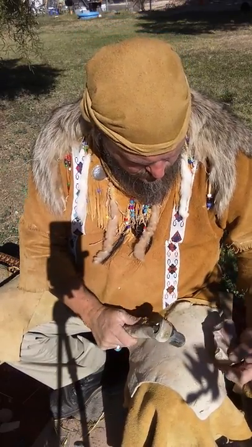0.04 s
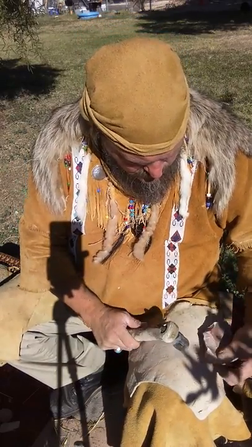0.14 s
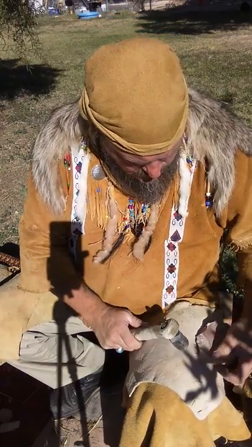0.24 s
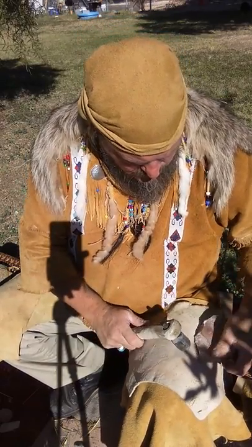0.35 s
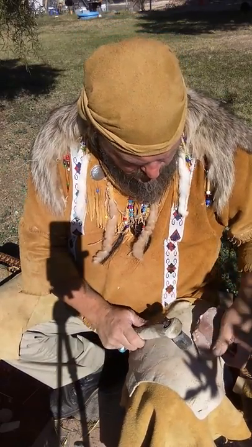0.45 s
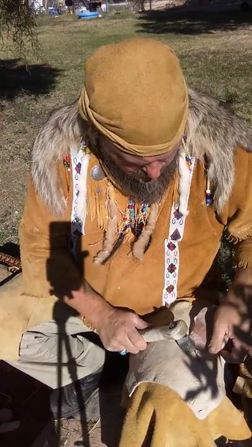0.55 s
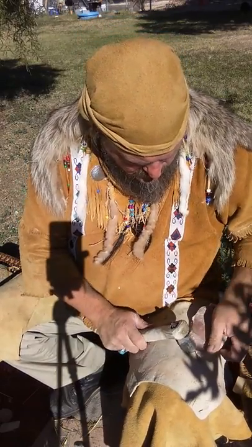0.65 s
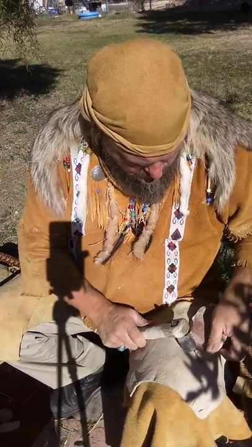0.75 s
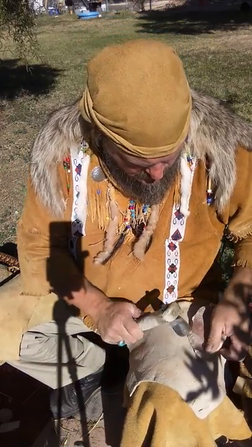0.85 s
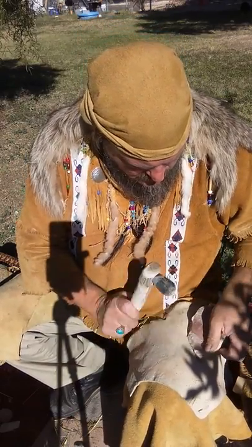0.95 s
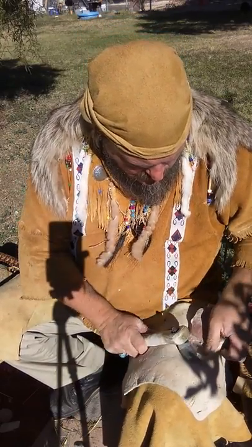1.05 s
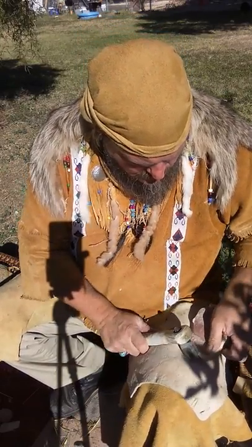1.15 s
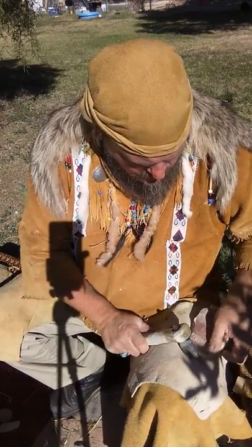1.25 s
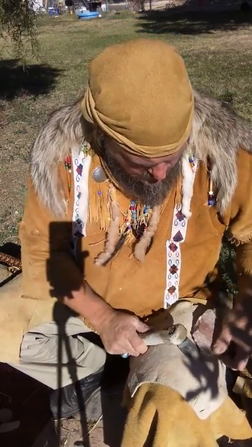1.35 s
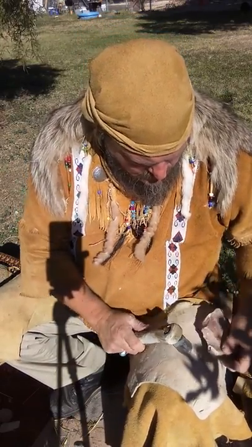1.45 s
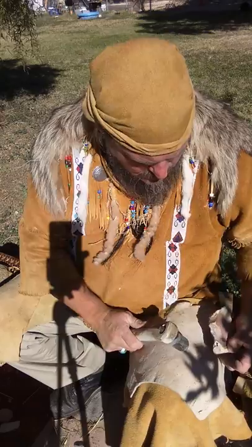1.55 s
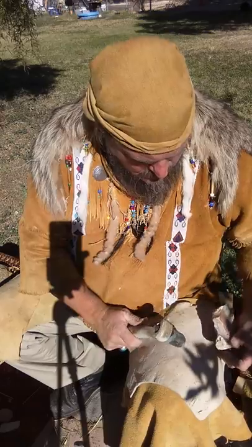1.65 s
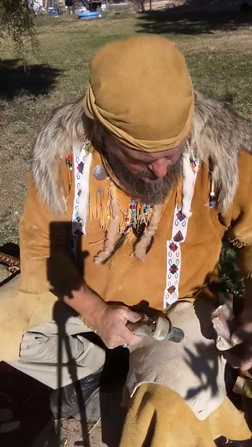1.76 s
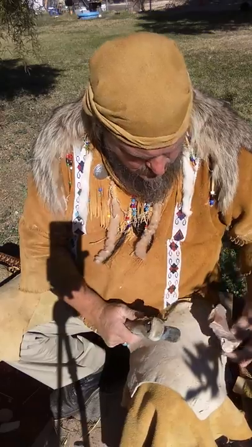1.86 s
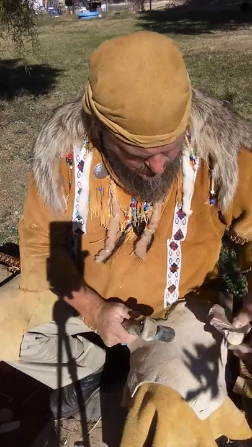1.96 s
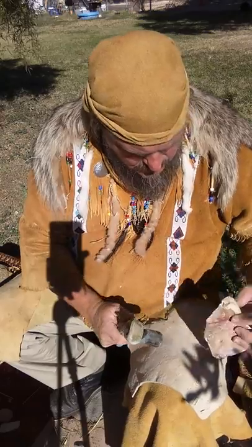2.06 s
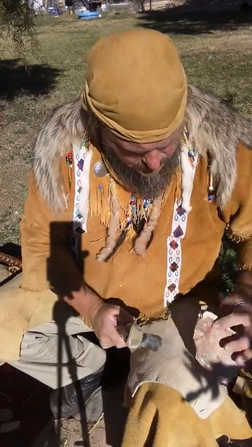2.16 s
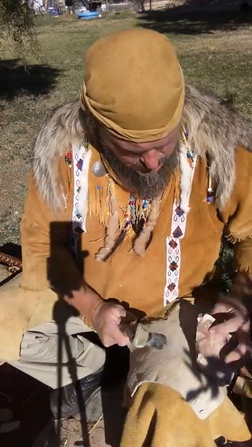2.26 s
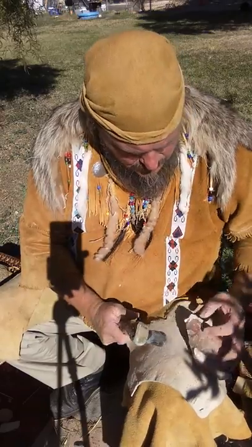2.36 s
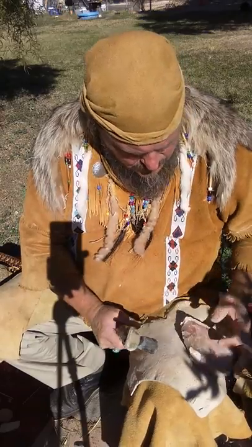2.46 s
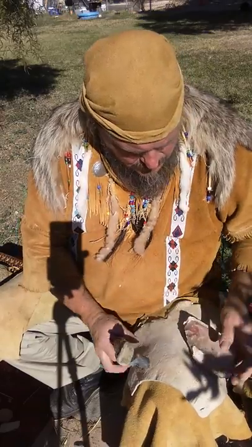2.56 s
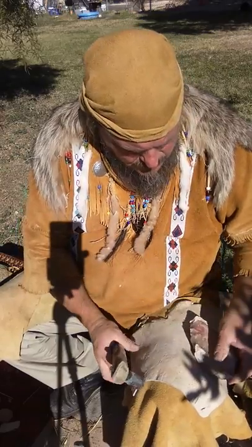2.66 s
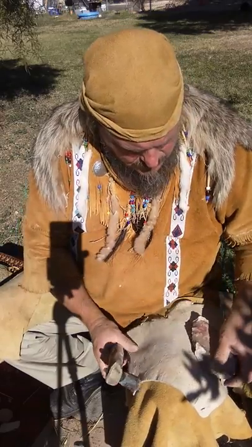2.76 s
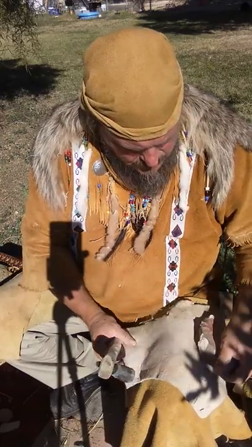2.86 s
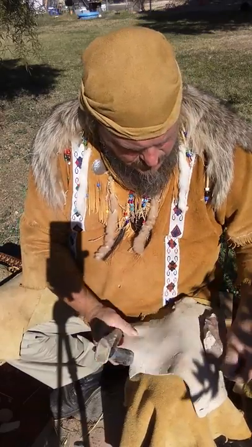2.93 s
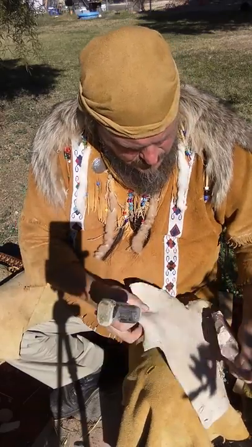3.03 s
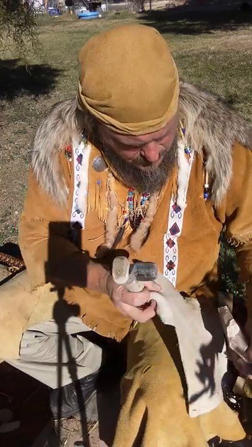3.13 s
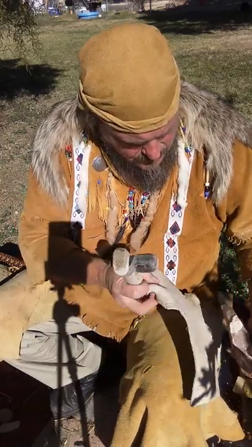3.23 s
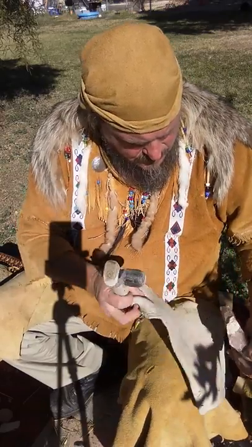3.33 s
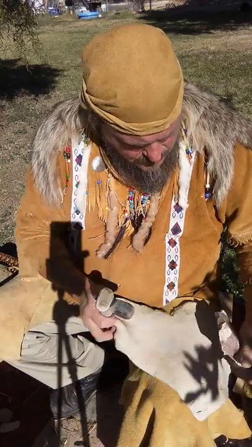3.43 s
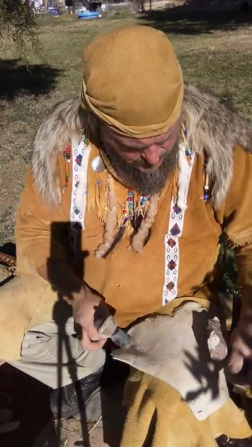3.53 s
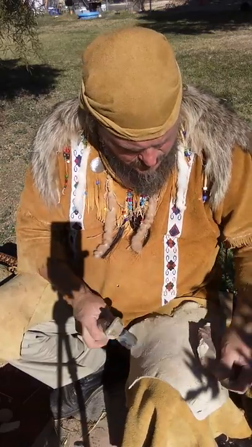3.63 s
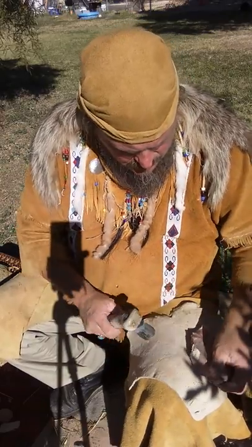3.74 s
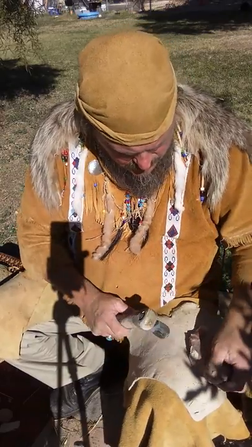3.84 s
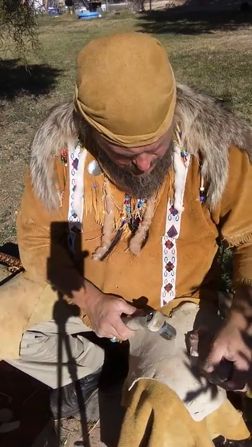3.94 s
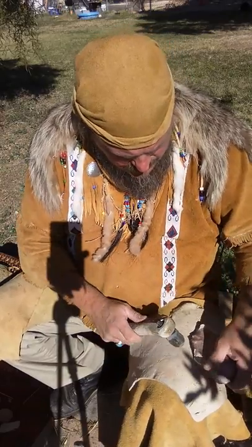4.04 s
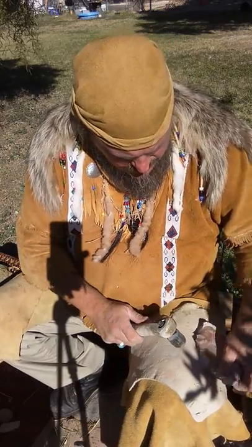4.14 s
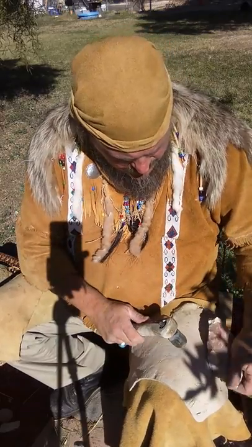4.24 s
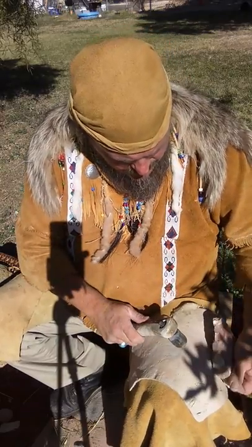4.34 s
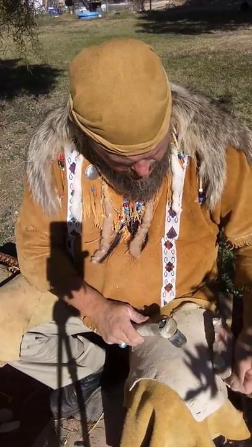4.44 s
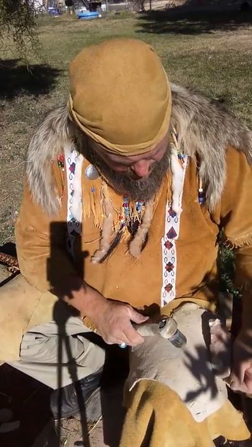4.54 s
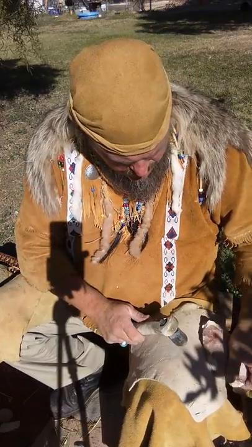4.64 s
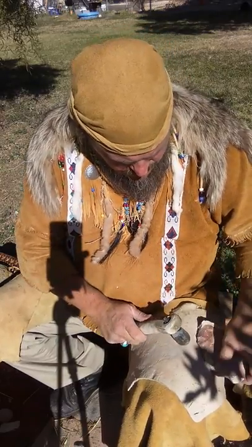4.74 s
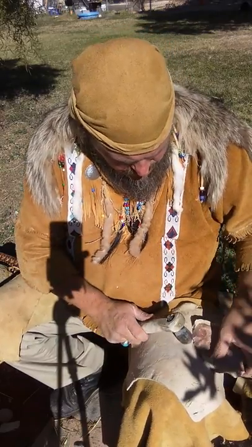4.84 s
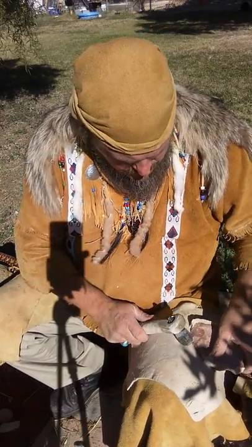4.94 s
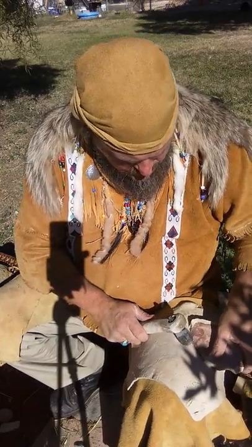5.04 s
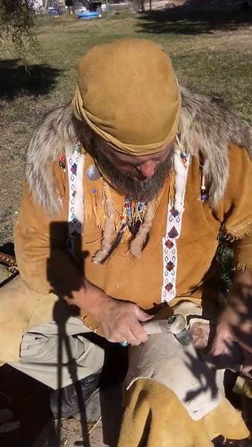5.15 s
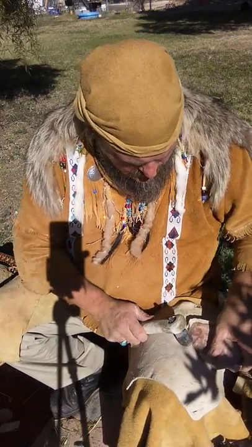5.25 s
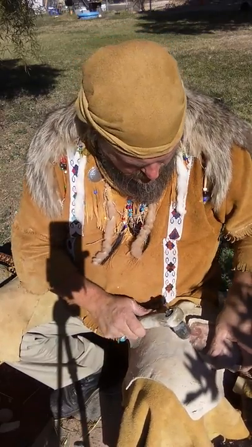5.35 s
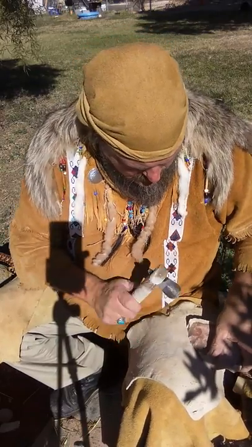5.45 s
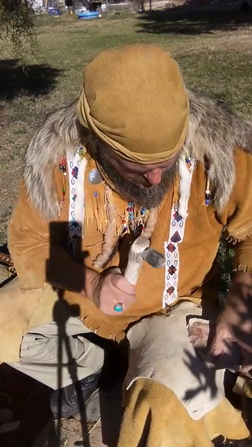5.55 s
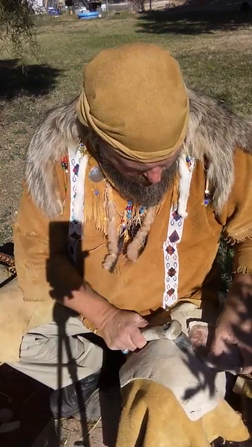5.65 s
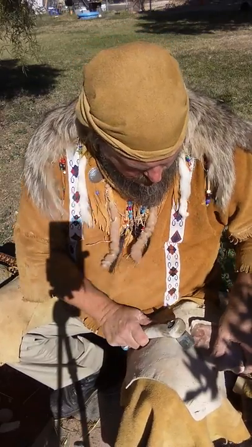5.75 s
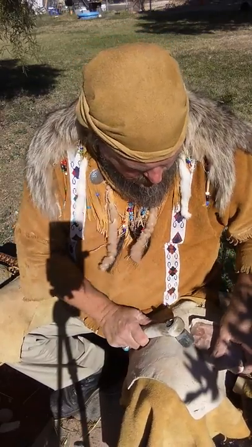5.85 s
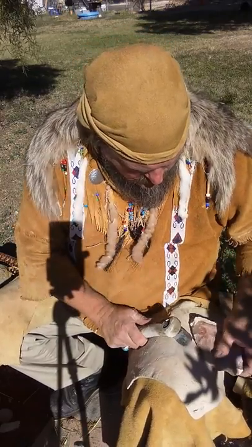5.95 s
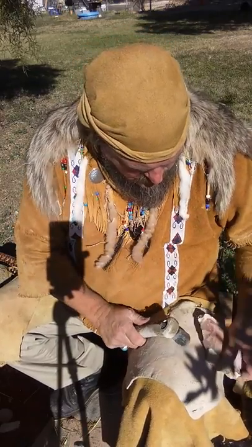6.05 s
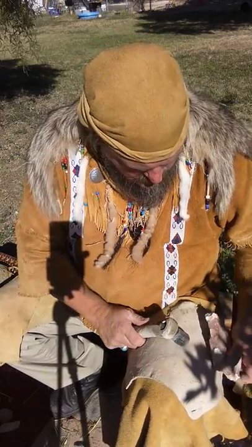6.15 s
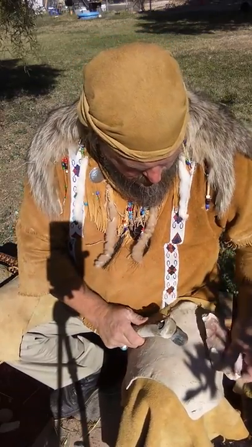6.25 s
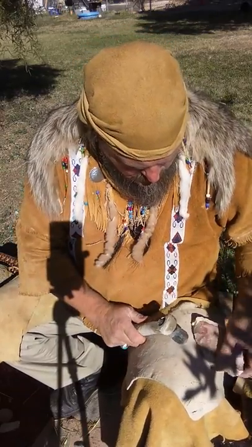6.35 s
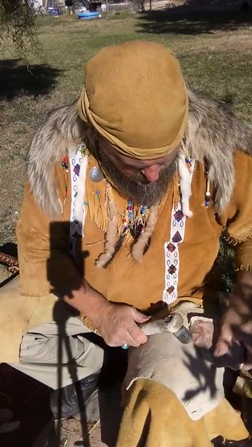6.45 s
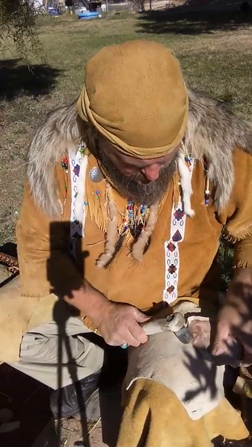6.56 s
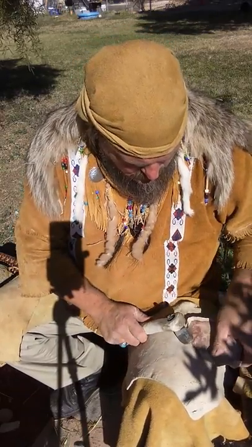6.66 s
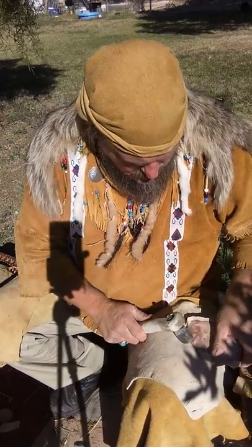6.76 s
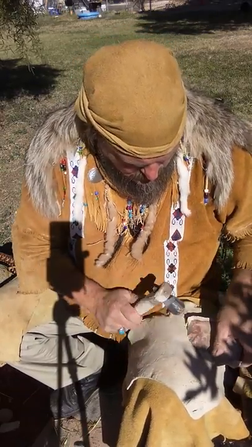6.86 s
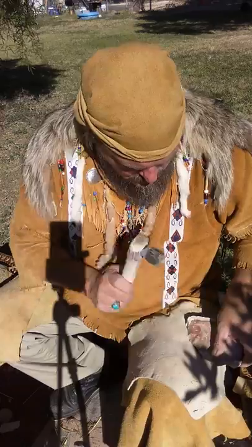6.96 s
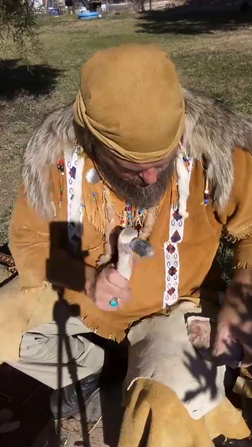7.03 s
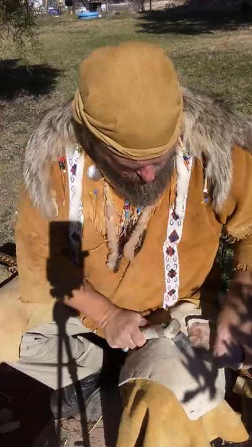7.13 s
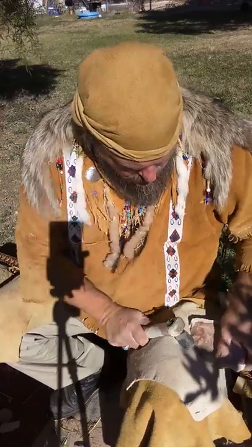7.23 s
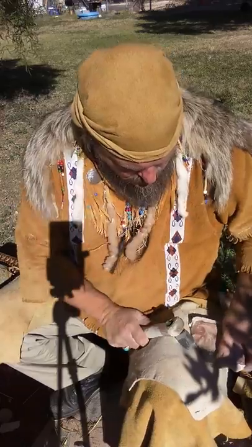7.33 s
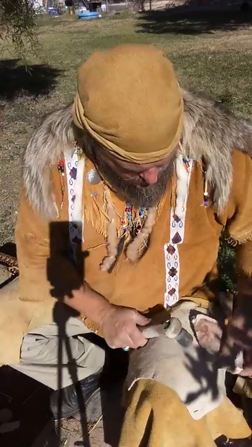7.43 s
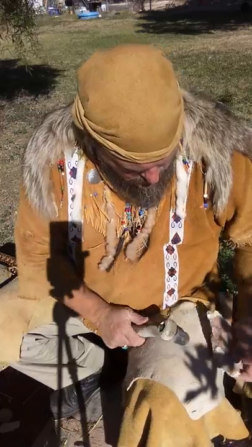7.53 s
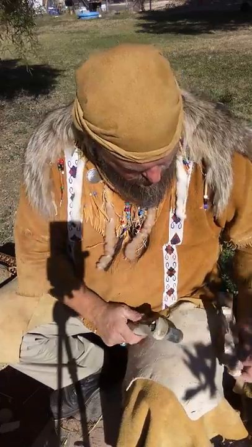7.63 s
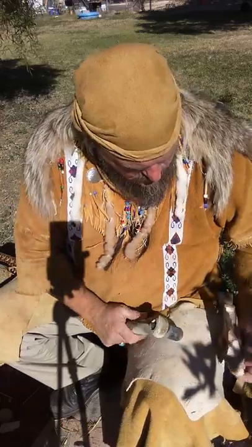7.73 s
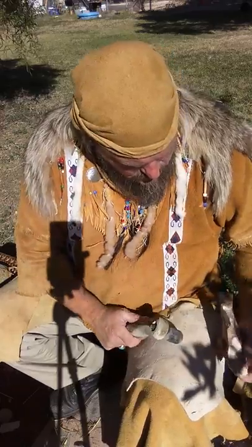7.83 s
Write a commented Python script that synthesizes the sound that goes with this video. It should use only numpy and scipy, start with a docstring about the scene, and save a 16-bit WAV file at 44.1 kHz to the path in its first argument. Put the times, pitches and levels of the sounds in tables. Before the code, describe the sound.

Three loud, dry stone strikes dominate: the first snappy and tinkling, the later two duller, crunchier and closer together. Between them are very faint hide rustles, scuffs and gritty ticks. Far away, a rooster's hoarse drawn-out crow, two single dog barks, small bird chirps and thin insect pips. The microphone is near the work outdoors, with soft air noise and low wind buffeting that grows into gusts.

```python
"""Flint knapping outdoors: three hammer blows ring the modes of a hand-damped stone and a thin chip, over noise
bursts for snap, crunch and the thud into a padded leg; shaped noise is the answer of ground, fence and wall.
Handling is leather noise in strokes, scuffs, grit ticks and a tool knock. Far off, harmonic voices make a crowing
rooster and a dog that barks twice; gliding and buzzing tones make small birds and a low call, over insect pips.
Low noise in breeze and gusts is wind buffeting the microphone ports, above soft air noise."""
import sys
import numpy as np
from scipy import signal
from scipy.fft import rfft, irfft, next_fast_len
from scipy.io import wavfile
from scipy.ndimage import map_coordinates

SR = 44100
rng = np.random.default_rng(int(sys.argv[2]) if len(sys.argv) > 2 else 0)


def digitize_waveform(pressure):
    """Quantize a signal to 16-bit integers and store it at the path in sys.argv[1].

    Rows of a 2-D input are taken as channels; values are limited to [-1, 1].
    """
    field = np.atleast_2d(pressure).T
    bounded = np.clip(field, -1, 1)
    quanta = np.round(bounded * 32767).astype(np.int16)
    wavfile.write(sys.argv[1], SR, quanta)


N = 347949

# Levels in the tables are relative: each source trims them.
# Hammer blows. Each row: start in seconds, level in dB, most excited pitch in Hz, crunch t60 in seconds,
# chip level in dB, thud level in dB, thud pitch in Hz, yard level over the blow in dB.
BLOWS = [(0.9719, -5, 1830, 0.031, -8, -28, 320, -5.5), (5.5791, -5, 3600, .055, -23, -13.5, 485, 0.64),
         (7.041, -4, 3230, .055, -28.5, -9, 345, -0.5)]
# Modes of the stone. Each row: frequency in Hz, level in dB, t60 in seconds before the hand's limit.
STONE_MODES = [(1488, -3, 0.069), (1680, -0.5, .03), (1962, -8, .035), (2248, -7, 0.039),
               (2706, -9.5, 0.029), (3250, -10.5, 0.03), (3430, -3, 0.036), (3604, -7.5, 0.036),
               (4070, -13, .045), (4380, -13.5, .04), (5900, -12, 0.036), (6200, -13.5, 0.015),
               (7450, -13.5, .03), (8260, -9, 0.13)]
HAND_LIMIT_T60_S = 0.05
# Modes of the thin chip. Each row: frequency in Hz, level in dB, t60 in seconds.
CHIP_MODES = [(9280, -3, 0.046), (13100, -16.5, 0.044), (15500, -22, .03)]
# Spectrum of the crunch. Each row: frequency in Hz, level in dB.
CRUNCH_SPECTRUM = [(60, -14), (160, -8), (290, -2), (550, -9.5), (1000, -3.5), (1500, -2), (2100, -1),
                   (2700, 0.5), (4000, 4), (6000, -5), (9000, -11.5), (13500, -14.5), (16000, -28.5)]
# Modes of the hammer's handle. Each row: frequency in Hz, level in dB, t60 in seconds.
HAFT_MODES = [(593, -3, 0.013), (683, 0.5, .035)]
PAD_WIDTH_OCT, PAD_T60_S = 0.38, 0.027
# Stone as the two ports hear it. Each row: frequency in Hz, left minus right in dB.
PORT_LEVEL = [(60, 6), (130, 2), (290, -4), (640, 1.5), (1410, 1), (3100, 2.5), (6820, 6.0), (15000, 6)]
# Phase between the ports. Each row: frequency in Hz, lead of the left in radians.
PORT_PHASE = [(100, 1), (300, 1.9), (600, 1.2), (1100, 2), (1600, 2.4), (2300, 0.63), (3500, 1.5),
              (6000, 2.5), (9300, 1.8), (14000, 1.1)]
# Spectrum of the yard's scatter. Each row: frequency in Hz, level in dB.
YARD_SPECTRUM = [(100, -3), (250, 3.5), (500, -1.5), (1100, -4.5), (1600, 3), (2600, 1.5), (3900, 0),
                 (5200, -11), (9000, -12.5), (15000, -19.5)]

# Hide pulled, or stone turned on it. Each row: start in seconds, length in seconds, level in dB.
STROKES = [(0.21, 0.33, -70), (0.475, 0.45, -68.5), (1.86, 0.51, -78), (2.27, 0.31, -67),
           (2.474, 0.747, -67), (3.15, 0.79, -72), (3.904, .45, -67), (4.608, 0.268, -78.5),
           (6.383, 0.32, -76.5), (7.293, 0.43, -73)]
STROKE_ATTACK_S, STROKE_RELEASE_S = 0.064, 0.19
# Spectrum of leather. Each row: frequency in Hz, level in dB.
LEATHER_SPECTRUM = [(120, -15.5), (250, 0.5), (400, -13), (750, -9.5), (1300, -8.5), (2300, -15),
                    (4400, -15.5), (8000, -22.5), (14500, -20.5), (16000, -32.5)]
# Stone, hide and sleeve brush past each other. Each row: centre time in seconds, level in dB,
# time from peak to 1/e in seconds, centre in Hz, width in octaves.
SCUFFS = [(0.277, -55, 0.017, 3580, 0.45), (0.541, -59.5, 0.037, 12000, 2.2),
          (0.703, -66.5, 0.18, 4000, .4), (1.259, -59, 0.022, 4100, 0.48), (2.903, -69, 0.115, 6980, 0.41),
          (4.086, -66, 0.13, 6220, 3.05), (5.341, -67.5, 0.0604, 2048, 1.1),
          (6.492, -56.5, 0.007, 3540, 0.13), (7.522, -72.5, 0.14, 2200, 0.58)]
# Grit. Each row: start in seconds, level in dB, spectrum level at 3500 Hz in dB.
TICKS = [(0.507, -43.5, -5), (0.5153, -42, -6.5), (0.7514, -41, -4), (2.529, -38, -24), (2.6349, -40, 1),
         (3.1901, -46, -24.5), (3.2674, -44.5, -18), (3.318, -42.5, -10.5), (3.525, -39.5, 12.5),
         (4.6462, -49.5, -1.5), (7.4431, -55.5, -6)]
# Tool nudged. Each row: start in seconds, level in dB.
KNOCKS = [(3.524, -30.5)]
# Modes of the nudged tool. Each row: frequency in Hz, level in dB, t60 in seconds.
TOOL_MODES = [(290, -5, 0.033), (453, -1.5, 0.023), (880, 4.5, 0.022), (1310, 13, 0.01), (1640, 2, 0.02),
              (2090, -4, 0.017)]

# Rooster notes. Each row: start in seconds, length in seconds, second harmonic in Hz, its sag in Hz per second,
# level in dB.
CROWS = [(-.04, 0.41, 1815, 390, -69.5), (0.475, 0.43, 1718, 200, -69.5), (2.29, 0.243, 1575, 144.7, -68.5),
         (2.56, 0.3, 1490, 111.7, -61), (2.82, 1.16, 1473, 126.5, -60)]
CROW_SWELL_SHARE, CROW_FADE_SHARE = 0.27, 0.46  # of a note's length
# Rooster's throat. Each row: frequency in Hz, level in dB.
CROW_THROAT = [(680, -23.5), (900, -8), (1350, -0.5), (1800, .5), (2100, -28), (2850, -20), (3500, -30)]
# Dog barks. Each row: start in seconds, level in dB, starting pitch in Hz.
BARKS = [(3.2, -57, 470.8), (5.79, -55, 494)]
BARK_S, BARK_ATTACK_S, BARK_RELEASE_S, BARK_RISE_HZ_PER_S = 0.17, 0.059, 0.11, 780
# Dog's throat. Each row: frequency in Hz, level in dB.
DOG_THROAT = [(480, 2), (630, 11), (1100, 5.5), (1700, -1), (2250, -8), (3000, -25)]
# Bird whistles. Each row: start in seconds, time to the middle pitch in seconds, time on to the last in seconds,
# first pitch in Hz, middle pitch in Hz, last pitch in Hz, level in dB.
WHISTLES = [(-.02, 0.019, 0.04, 5400, 5360, 4870, -58), (1.956, 0.053, 0.12, 2240, 3830, 2820, -57.5),
            (4.46, 0.017, 0.11, 5460, 5400, 4960, -68.5), (6.071, 0.0367, 0.017, 3500, 3700, 3830, -54),
            (6.194, 0.039, 0.084, 3420, 3723, 3800, -57.5)]
WHISTLE_ATTACK_S, WHISTLE_RELEASE_S = 0.04, 0.018
# Buzzy far calls: small birds, and one low call, probably a rooster. Each row: centre time in seconds,
# time from peak to 1/e in seconds, pitch in Hz, level in dB.
BUZZES = [(0.7, 0.041, 5520, -81), (3.674, 0.12, 4976, -70), (3.881, 0.13, 5140, -71.5),
          (6.143, 0.043, 4100, -66), (7.571, 0.092, 4100, -65.5), (7.544, 0.14, 1403, -66.5)]
# Insects. Each row: mean pitch in Hz, mean level in dB, pips per second.
INSECTS = [(4800, -73.5, 34), (3770, -74.5, 23)]

# Breeze. Each row: time in seconds, strength in dB.
BREEZE = [(0.0, -56.5), (0.99, -59), (1.14, -54), (1.43, -59.5), (2.22, -62.5), (2.55, -54), (3.49, -51.5),
          (4.66, -54), (4.83, -51), (5.47, -52), (5.6, -44.5), (6.02, -41.5), (7.47, -50), (7.89, -55.5)]
BREEZE_TRIM_DB, BREEZE_LEFT_MINUS_RIGHT_DB, TURBULENCE_DB = 4, 6, 3
# Spectrum of the buffeting. Each row: frequency in Hz, level in dB.
BUFFET_SPECTRUM = [(20, -36.5), (45, -1), (68, 1.5), (100, -4.5), (145, -13.5), (210, -20), (320, -31),
                   (500, -44), (900, -68.5)]
# Gusts on the ports. Each row: start in seconds, length in seconds, level in dB, left minus right in dB,
# level of the eddy at the front in dB.
GUSTS = [(0.182, 0.081, -44.5, -15, -58), (0.274, 0.15, -47.5, -4, -57), (3.33, 0.41, -44.5, 0.5, -45.5),
         (4.135, 0.13, -39.5, -2, -51.5), (4.873, 0.065, -41.5, -19.5, -29.5),
         (4.935, 0.069, -38.5, -14, -27.5), (5.149, 0.054, -33, -16.5, -36),
         (5.424, .15, -34.5, -16.5, -37.5), (5.745, 0.133, -38, -14.5, -33),
         (5.929, 0.23, -33.5, 2.5, -30.5), (6.13, .16, -32, -9.5, -27), (6.468, .15, -30, 6, -39),
         (7.431, .1, -38.5, -5, -40.5)]
GUST_ATTACK_S, GUST_RELEASE_S = 0.022, 0.07
# Spectrum of an eddy. Each row: frequency in Hz, level in dB.
EDDY_SPECTRUM = [(40, -5), (110, 2.5), (220, -18.5), (350, -33), (600, -46), (1500, -75)]
EDDY_ATTACK_S = 0.004
# Spectrum of the quiet yard. Each row: frequency in Hz, level in dB.
AIR_SPECTRUM = [(100, -3), (250, -5), (400, -12.5), (630, -12), (900, -11.5), (1400, -21), (2400, -23.5),
                (4000, -23), (4900, -23.5), (5900, -29), (14500, -27.5), (16000, -37)]
BAND_LIMIT_HZ = 15900


def amp(db):
    """Amplitude factor of a level in dB."""
    return 10 ** (np.asarray(db) / 20)


def unit(x):
    """Scale to rms 1."""
    return x / np.sqrt(np.mean(x ** 2) + 1e-20)


def along(points, hz):
    """Interpolate (Hz, value) points on a log frequency axis."""
    point_hz, value = np.transpose(points)
    return np.interp(np.log(hz + 1), np.log(point_hz + 1), value)


def clock():
    """Time of every sample in seconds."""
    return np.arange(N) / SR


def curves(rows):
    """One value per sample for each column after the time."""
    s, *columns = np.transpose(rows)
    return [np.interp(clock(), s, column) for column in columns]


def wobble(knots_per_s):
    """Smooth random curve through normal knots."""
    knots = rng.standard_normal(int(N * knots_per_s / SR) + 4)
    return map_coordinates(knots, [np.arange(N) * knots_per_s / SR])


def filtered(x, response):
    """Apply a response of frequency, by FFT."""
    size = x.shape[-1]
    padded = next_fast_len(size + 8192)
    spectrum = rfft(x, padded) * response(np.fft.rfftfreq(padded, 1 / SR))
    return irfft(spectrum, padded)[..., :size]


def bell(centre_hz, width_oct):
    """Spectrum with one hump."""
    return [(centre_hz * 2 ** (k * width_oct), -6 * abs(k) ** 1.5) for k in range(-4, 5)]


def noise(spectrum, size, alike):
    """Coloured stereo noise of rms 1; alike is the left-right correlation."""
    white = rng.standard_normal((2, size))
    mid, side = filtered(white, lambda hz: amp(along(spectrum, hz)))
    turn = np.arccos(np.clip(alike, -1, 1)) / 2
    return unit(np.cos(turn) * mid + np.sin(turn) * np.array([side, -side]))


def pan(left_minus_right_db):
    """Left and right gains."""
    return amp([[left_minus_right_db / 2], [-left_minus_right_db / 2]])


def dying(t, t60_s):
    """Exponential decay, 60 dB in t60_s."""
    return np.exp(-np.log(1000) * t / t60_s)


def onset(t, rise_s):
    """Exponential approach to 1."""
    return 1 - np.exp(-t / rise_s)


def envelope(s, length_s, attack_s, release_s):
    """Rise from time s, hold, and be gone after length_s."""
    t = clock() - s
    return np.clip(np.minimum(t / attack_s, (length_s - t) / release_s), 0, 1)


def ring(modes, t, spread_rad):
    """Fading sine modes; each reaches the two ports with its own phase."""
    out = np.zeros((2, len(t)))
    for hz, db, t60_s in modes:
        phase = rng.uniform(0, 2 * np.pi) + spread_rad * rng.standard_normal((2, 1))
        level = amp(db + rng.normal(0, 0.53))
        out += level * dying(t, t60_s) * np.sin(2 * np.pi * hz * t + phase)
    return out


def add(track, s, sound):
    """Mix a sound in at time s."""
    i = max(round(s * SR), 0)
    track[:, i:i + sound.shape[-1]] += sound[:, :max(N - i, 0)]


def ports(x):
    """The stone lies to the left, so the two ports hear it with differing level and phase."""
    side = np.array([[0.5], [-0.5]])

    def response(hz):
        return amp(side * along(PORT_LEVEL, hz)) * np.exp(1j * side * along(PORT_PHASE, hz))
    return filtered(x, response)


def distant(x, t60_s, wet):
    """A far source with its diffuse trail from trees and walls."""
    t = np.arange(SR) / SR
    tail = rng.standard_normal((2, SR)) * dying(t, t60_s)
    tail /= np.linalg.norm(tail[0])
    trail = signal.fftconvolve(x[None], tail, axes=1)[:, :N]
    return (x + wet * trail) / np.hypot(1, wet)


def blows():
    """Each blow snaps, crunches, rings the stone and the chip, and thuds into the padded leg."""
    out, t = np.zeros((2, N)), np.arange(SR) / SR
    for s, db, pitch_hz, crunch_t60_s, chip_db, thud_db, thud_hz, _ in BLOWS:
        # the place of contact decides which modes are driven hardest; the hand limits their ring
        modes = [(hz, level - 8.1 * abs(np.log2(hz / pitch_hz)), min(t60_s, HAND_LIMIT_T60_S))
                 for hz, level, t60_s in STONE_MODES]
        stone = amp(db + 1.5) * ring(modes, t, spread_rad=0.34)
        snap = amp(db - 4.5) * noise(bell(9000, 0.45), len(t), alike=0.6) * dying(t, 0.0096)
        crunch = amp(db - 2.5) * noise(CRUNCH_SPECTRUM, len(t), alike=0.29) * dying(t, crunch_t60_s)
        chip = amp(chip_db + 2.5) * ring(CHIP_MODES, t, spread_rad=0.29) * onset(t, 0.00066)
        chip *= 1 + 0.5 * np.cos(2 * np.pi * 85 * (t - 0.004))  # close pairs of modes beat
        # dust sprays off with the chip
        dust = amp(chip_db - 53) * noise(bell(9300, 0.63), len(t), alike=0.1) * dying(t, 1.4)
        thud = amp(thud_db) * noise(bell(thud_hz, PAD_WIDTH_OCT), len(t), alike=0.94)
        thud *= dying(t, PAD_T60_S)
        push = amp(thud_db - 2.5) * np.sin(2 * np.pi * 62 * t) * dying(t, 0.072)  # the leg gives way
        haft = amp(thud_db - 4) * ring(HAFT_MODES, t, spread_rad=0.22)  # short woody knock
        blow = stone + snap + crunch + chip + dust + thud + haft - push
        add(out, s, blow * onset(t, 0.00031))
    return ports(out)


def yard():
    """The ground scatters each blow, a fence throws it back, a wall slaps, and a faint tail lingers."""
    out, t = np.zeros((2, N)), np.arange(SR) / SR
    for s, db, pitch_hz, *_, yard_db in BLOWS:
        # echoes keep the colour of their blow
        colour = [(hz, level - 3 * abs(np.log2(hz / pitch_hz))) for hz, level in YARD_SPECTRUM]
        ground = amp(-22) * dying(t, 0.2)
        fence = amp(-44.5) * np.exp(-((t - 0.105) / 0.057) ** 2)
        tail = amp(-48) * dying(t, 1.5)
        lumps = amp(1.9 * wobble(260)[:len(t)])  # single reflectors stand out
        strength = np.sqrt(ground ** 2 + fence ** 2 + tail ** 2)
        scatter = strength * lumps * noise(colour, len(t), alike=0.21)
        add(out, s, amp(db + yard_db) * scatter * onset(t, 0.0027) * pan(4.9))
        slap = noise(bell(pitch_hz, 0.43), len(t), alike=0.1) * dying(t, 0.062) * onset(t, 0.0011)
        add(out, s + 0.138, amp(db + 1.5 * yard_db - 32) * slap)
    return out


def handling():
    """Leather rustles in uneven strokes, surfaces scuff, grit ticks and the tool knocks once."""
    out, t = np.zeros((2, N)), np.arange(SR // 2) / SR
    stroke = sum(amp(db) * envelope(s, length_s, STROKE_ATTACK_S, STROKE_RELEASE_S)
                 for s, length_s, db in STROKES)
    grain = amp(2.4 * wobble(22) + 2.37 * wobble(330))  # the nap catches and slips
    out += amp(5.5) * stroke * grain * noise(LEATHER_SPECTRUM, N, alike=0) * pan(5.8)
    for s, db, half_s, centre_hz, width_oct in SCUFFS:
        swell = np.exp(-((t - t.mean()) / half_s) ** 2) * amp(1.9 * wobble(250)[:len(t)])
        brush = noise(bell(centre_hz, width_oct), len(t), alike=0.2)
        add(out, s - t.mean(), amp(db) * swell * brush * pan(4.3))
    for s, db, body_db in TICKS:
        colour = [(500, body_db - 6.5), (3500, body_db), (8000, -10), (15000, -7)]
        tick = noise(colour, len(t), alike=0.3) * dying(t, 0.024)
        add(out, s, amp(db - 8.5) * tick * pan(16))
    for s, db in KNOCKS:
        rub = amp(2) * noise(bell(1040, 0.49), len(t), alike=0.24) * dying(t, 0.032)
        contact = ring(TOOL_MODES, t, spread_rad=0.87) + rub
        add(out, s, amp(db - 4) * contact * onset(t, 0.00099))
    return out


def rooster():
    """Rasping harmonic notes swell and sink; at this distance mostly the second harmonic is left."""
    second_hz, level = np.full(N, float(CROWS[0][2])), np.zeros(N)
    for s, length_s, hz, sag_hz_per_s, db in CROWS:
        sagging_hz = hz - sag_hz_per_s * np.minimum(clock() - s, length_s)
        second_hz = np.where(clock() >= s, sagging_hz, second_hz)
        level += amp(db) * envelope(s, length_s, CROW_SWELL_SHARE * length_s, CROW_FADE_SHARE * length_s)
    rasp = 1 + 0.006 * wobble(40) + 0.02 * wobble(500)
    phase = np.pi * np.cumsum(second_hz * rasp) / SR  # of the fundamental, half of second_hz
    voice = np.zeros(N)
    for k in range(1, 5):
        harmonic_db = along(CROW_THROAT, k * second_hz / 2) + 3.9 * wobble(45) + 1.2 * wobble(12)
        voice += amp(harmonic_db) * np.sin(k * phase)
    return distant(amp(4.5) * level * voice, t60_s=0.59, wet=0.75) * pan(11)


def dog():
    """Two barks: rising harmonics through a throat, hoarse by random pitch and level."""
    out = np.zeros(N)
    for s, db, start_hz in BARKS:
        hz = start_hz + BARK_RISE_HZ_PER_S * np.clip(clock() - s, 0, BARK_S)
        phase = 2 * np.pi * np.cumsum(hz * (1 + 0.042 * wobble(500))) / SR
        voice = sum(amp(along(DOG_THROAT, k * hz) + 3.7 * wobble(160)) * np.sin(k * phase)
                    for k in range(1, 6))
        out += amp(db) * envelope(s, BARK_S, BARK_ATTACK_S, BARK_RELEASE_S) * voice
    return distant(out, t60_s=1.24, wet=0.81) * pan(5.5)


def far_calls():
    """Bird whistles are gliding sines; buzzy calls, one of them low, are sines with fast random pitch."""
    calls, flutter = np.zeros(N), 1 + 0.0128 * wobble(300)
    for s, to_middle_s, to_last_s, first_hz, middle_hz, last_hz, db in WHISTLES:
        length_s = to_middle_s + to_last_s
        hz = np.interp(clock() - s, [0, to_middle_s, length_s], [first_hz, middle_hz, last_hz])
        level = amp(db) * envelope(s, length_s, WHISTLE_ATTACK_S, WHISTLE_RELEASE_S)
        calls += level * np.sin(2 * np.pi * np.cumsum(hz * flutter) / SR)
    for s, half_s, hz, db in BUZZES:
        swell = np.exp(-((clock() - s) / half_s) ** 2)
        calls += amp(db) * swell * np.sin(2 * np.pi * np.cumsum(hz + 190 * wobble(900)) / SR)
    return distant(calls, t60_s=0.35, wet=0.62) * pan(2.3)


def insects():
    """Ceaseless short sine pips, uneven in timing, level, pitch and side."""
    out, t = np.zeros((2, N)), np.arange(SR // 90) / SR
    for hz, db, pips_per_s in INSECTS:
        draws = rng.standard_normal((int(pips_per_s * N / SR), 4))
        for k, (late, size, detune, side) in enumerate(draws):
            pip = np.hanning(len(t)) * np.sin(2 * np.pi * hz * (1 + 0.023 * detune) * t)
            add(out, (k + 0.067 * late) / pips_per_s, amp(db + 1.9 * size) * pip * pan(3 * side))
    return out


def wind():
    """Turbulent breeze and gusts, each with an eddy at its front, buffet the ports; breeze and gust powers add."""
    turbulence = amp(TURBULENCE_DB * np.array([wobble(19), wobble(40)]))  # left, right
    breeze = amp(curves(BREEZE)[0] + BREEZE_TRIM_DB)
    power = (breeze * turbulence * pan(BREEZE_LEFT_MINUS_RIGHT_DB)) ** 2
    eddies, t = np.zeros((2, N)), np.arange(SR // 6) / SR
    for s, length_s, db, left_minus_right_db, eddy_db in GUSTS:
        side = pan(left_minus_right_db)
        power += (amp(db) * envelope(s, length_s, GUST_ATTACK_S, GUST_RELEASE_S) * side) ** 2
        eddy = noise(EDDY_SPECTRUM, len(t), alike=-0.23) * dying(t, 0.039)
        eddy *= 1 - np.exp(-(t / EDDY_ATTACK_S) ** 2)
        add(eddies, s, amp(eddy_db) * eddy * side)
    return np.sqrt(power) * noise(BUFFET_SPECTRUM, N, alike=-0.38) + eddies


def air():
    """Soft, slowly varying noise of the quiet yard."""
    return amp(-64 + 0.9 * wobble(2.1)) * noise(AIR_SPECTRUM, N, alike=-0.074) * pan(2.5)


def scene():
    """The knapper close by, the animals far off, the wind on the microphone."""
    return blows() + yard() + handling() + rooster() + dog() + far_calls() + insects() + wind() + air()


def record(dry):
    """Cut the deepest bass, saturate as an overloaded input does, and keep nothing above the band limit."""
    lean = signal.sosfilt(signal.butter(4, 38, "high", fs=SR, output="sos"), dry)
    clipped = lean / (1 + np.abs(lean) ** 6) ** (1 / 6)
    return filtered(clipped, lambda hz: hz < BAND_LIMIT_HZ)


dry = scene()
out = record(dry)
digitize_waveform(out)
```